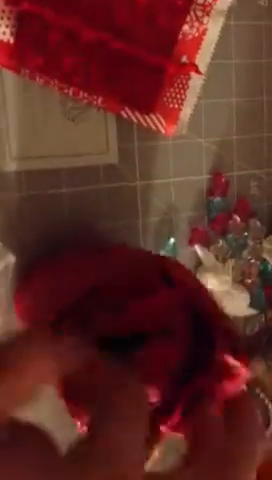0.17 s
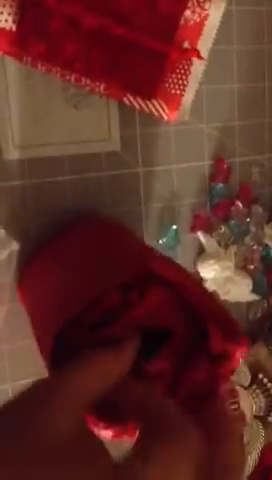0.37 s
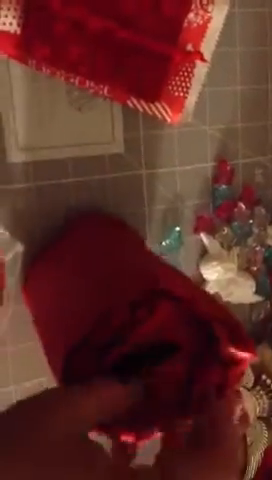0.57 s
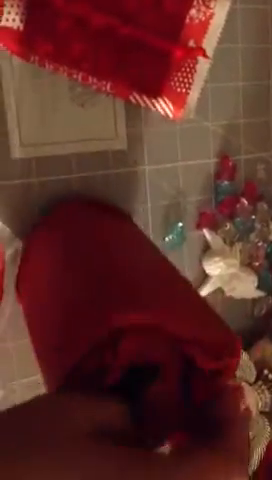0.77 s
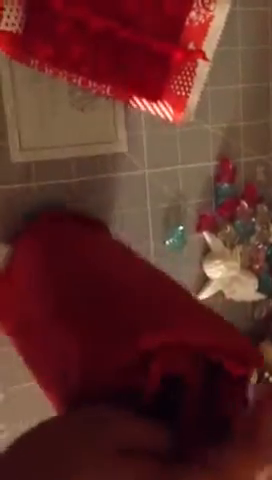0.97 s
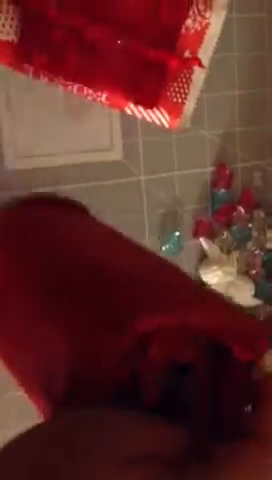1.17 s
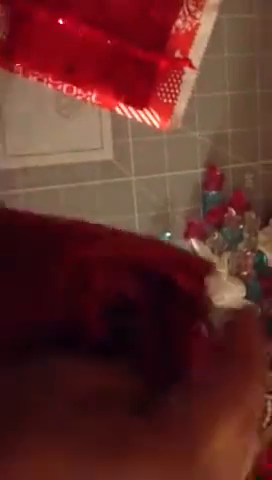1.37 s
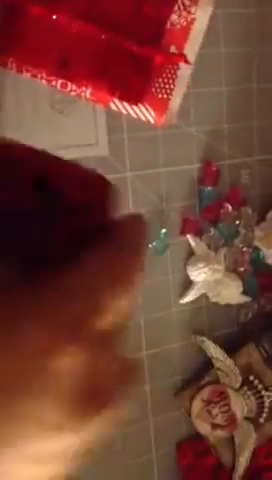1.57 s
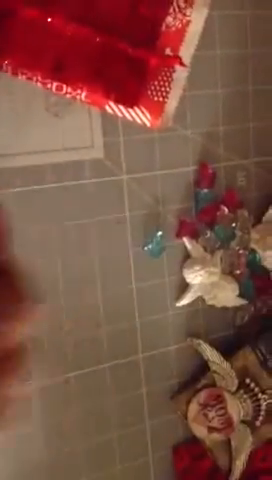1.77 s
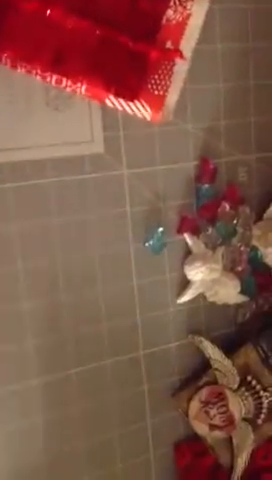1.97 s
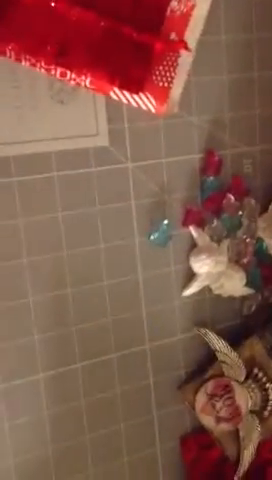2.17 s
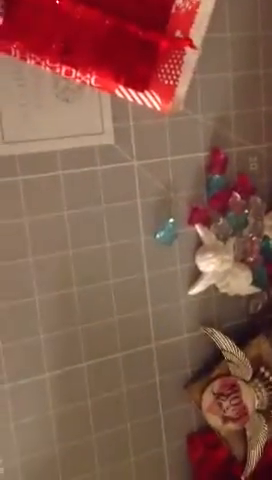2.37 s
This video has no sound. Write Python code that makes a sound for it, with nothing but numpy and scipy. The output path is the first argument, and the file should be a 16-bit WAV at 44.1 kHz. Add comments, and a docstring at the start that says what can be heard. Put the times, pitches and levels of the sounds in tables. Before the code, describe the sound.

Close to a small microphone indoors, wrapping paper crackles in uneven clumps while a present is handled. The paper rustles and snaps, eases briefly, then crackles a little lower as the parcel bumps faintly in the hands.

```python
"""Indoors, close to a small microphone, hands turn and squeeze a parcel in stiff shiny wrapping paper.
Small creases buckle in clumps and make a crackle, over the hiss of paper sliding on paper.
Each buckle is a tick and a few cycles of ring; the loudest snaps stand out and rattle through the folds.
A hollow in the wrap rings along, and the parcel bumps softly in the hands.
The quiet room adds a low hush and gives the snaps and bumps a short echo."""
import sys
import numpy as np
from scipy import signal
from scipy.fft import rfft, irfft
from scipy.io import wavfile
from scipy.ndimage import uniform_filter1d

SR = 44100
rng = np.random.default_rng(int(sys.argv[2]) if len(sys.argv) > 2 else 0)


def bounce(signal):
    """Save signal as a 16-bit WAV file at the path given by the first command-line argument."""
    frames = np.transpose(np.atleast_2d(signal))
    limited = np.clip(frames, -1, 1)
    pcm = np.round(limited * 32767).astype(np.int16)
    wavfile.write(sys.argv[1], SR, pcm)


N = 106192

# How hard the hands work the paper: time_s, level_db, bass_db, treble_db
# (bass and treble count only by how far they are above or below their column's average)
GRIP = [(0.0, -38.5, -7, -9), (0.08, -34.5, -6, -2.5), (0.15, -35.5, -13.5, -6), (0.239, -32, -11.5, -7),
        (0.282, -37.5, -14.5, -6.5), (0.35, -37.5, -18, -5.5), (0.44, -34, -24, -6),
        (0.481, -39.5, -34, -4), (0.55, -32.5, -18, -6.5), (0.73, -34.5, -18.5, -5), (0.76, -35.5, -16, -6),
        (0.84, -30, -12.5, -2.5), (0.87, -33, -14.5, -4.5), (0.93, -31.5, -16, -6.5),
        (0.98, -38.5, -12.5, -5), (1.05, -40.5, -18, -7), (1.08, -35.5, -25, -5.5),
        (1.12, -44.5, 0.5, -2.5), (1.14, -38.5, -10, -0.5), (1.17, -46.5, -20, -11),
        (1.239, -37.5, -6.5, -1.5), (1.28, -34, -8, -12.5), (1.33, -39.5, -12, -3), (1.37, -48, -12, -7),
        (1.42, -36, -13.5, -4.5), (1.47, -38.5, -6, -8), (1.499, -35.5, -9.5, -5.5), (1.64, -43, -10.5, -7),
        (1.67, -39.5, -9, -5), (1.71, -39.5, -11.5, -3), (1.781, -34.5, -6, -3.5), (1.87, -39.5, -6, -6),
        (1.93, -33, -3, -2.5), (1.97, -37, -5, -3.5), (2.05, -34, -6, -5), (2.2, -41, -5, -3),
        (2.28, -33, -2, -5), (2.31, -36.5, -6.5, -5.5), (2.349, -30, -7.5, -5.5), (2.41, -44, -5, 0.5)]
# The tone of the paper, from low to high: pitch_hz, gain_db
PAPER_TONE = [(60, -2), (173, -9.5), (479, -17.5), (656, -11.5), (1080, -9), (2550, -1.5), (4540, 0.5),
              (5170, -1.5), (9430, -6.5), (11300, -8), (15500, -12)]
# A hollow in the wrap that changes as the grip shifts: time_s, pitch_hz, gain_db
WRAP_HOLLOW = [(0, 3030, -19), (0.45, 4270, -12), (0.9, 3700, -21), (1.5, 3080, -28), (1.77, 4050, 2),
               (1.82, 3900, -15), (1.9, 2560, -1), (2.1, 2490, -4), (2.3, 2260, -10)]
# The tone of the quiet room: pitch_hz, gain_db
ROOM_TONE = [(25, -25), (59, -31), (132, -14.5), (172, -11.5), (477, -11), (649, -11.5), (1000, -13.5),
             (1300, -15.5), (2200, -120)]
# The loudest buckles: start_s, ring_db, ring_hz, second_ring_db, second_ring_hz, tick_db, push_db
LOUD_SNAPS = [(0.045, -21.5, 5930, -47, 3970, -38, -72), (0.067, -26, 4130, -22, 5790, -21, -50),
              (0.0695, -22, 6460, -27, 4330, -19, -58), (0.0817, -15, 5900, -17.5, 3830, -41.5, -66),
              (0.092, -17, 5400, -38, 3070, -36, -59), (0.1064, -22, 4200, -29, 7860, -44, -62),
              (0.127, -21, 3440, -39, 4890, -34, -53), (0.186, -16, 4150, -43, 2970, -21, -73),
              (0.2057, -15, 4040, -49, 2430, -20, -70), (0.2165, -16.5, 6500, -38, 4360, -35, -60),
              (0.2411, -16, 4100, -21, 6040, -35, -56), (0.293, -31, 3970, -35, 7800, -34, -62),
              (0.311, -9, 4700, -18, 2350, -24, -37), (0.3814, -20, 3680, -22.5, 2450, -33, -55),
              (0.4417, -15.5, 3600, -19, 2100, -23, -35.5), (0.444, -21, 5810, -36, 4220, -33, -57),
              (0.4496, -22, 4180, -30, 5750, -37, -68), (0.4604, -16, 4400, -29, 1950, -23, -43),
              (0.485, -7.5, 4370, -9.5, 7000, -18, -62), (0.6487, -22, 5640, -43, 3810, -46, -52),
              (0.656, -24, 6760, -32, 3430, -33, -49), (0.668, -26, 4670, -19, 7060, -19.5, -43),
              (0.6737, -19, 3680, -31, 5790, -24, -52), (0.7102, -20, 4800, -21, 3160, -35, -67),
              (0.7268, -22, 5540, -38, 3810, -19.5, -55), (0.79, -17.5, 3640, -25, 6630, -19, -72),
              (0.804, -19, 3470, -21, 7470, -26, -33.5), (0.811, -14, 4400, -19, 2500, -24, -54),
              (0.815, -17, 4640, -33.5, 2370, -30, -39), (0.8372, -15, 6120, -33, 3700, -20, -41),
              (0.8431, -15, 5170, -24, 2390, -28, -59), (0.8483, -11.5, 6000, -17, 3560, -6.5, -68),
              (0.855, -12, 4300, -32, 6200, -36, -56), (0.8748, -16.5, 3140, -43, 4760, -25, -61),
              (0.8896, -25, 3500, -29, 7300, -28, -64), (0.9253, -27, 4030, -35, 6000, -20, -62),
              (0.952, -28, 6040, -26, 2500, -22, -45), (0.9688, -32, 5840, -30, 8000, -31, -60),
              (0.9809, -29, 3600, -29.5, 2230, -40, -37.5), (1.0128, -20, 6000, -32, 8380, -27, -57),
              (1.036, -30, 5500, -28, 3200, -35, -60), (1.0412, -18.5, 6600, -23.5, 2870, -32, -67),
              (1.0654, -21.5, 2900, -22, 4910, -17.5, -53), (1.0763, -13.5, 6500, -17.5, 2600, -35, -40),
              (1.0894, -20, 6460, -26, 4300, -35, -60), (1.1053, -26, 3190, -30, 5210, -30, -59),
              (1.1425, -27.5, 2780, -22.5, 6720, -37.5, -61), (1.1868, -33, 5300, -28, 3420, -29, -57),
              (1.1997, -26, 2430, -27, 6330, -27, -58), (1.2101, -21, 3130, -24, 5150, -27, -54),
              (1.2319, -20, 2400, -24, 4130, -30, -34.5), (1.2705, -25, 4930, -25, 2780, -21.5, -48),
              (1.2862, -24, 4500, -23, 3170, -37, -53), (1.295, -41, 4690, -19.5, 6400, -30, -52),
              (1.3632, -20.5, 3280, -29, 2300, -29, -61), (1.403, -21.5, 5100, -26, 3080, -44, -46),
              (1.4147, -26, 2840, -37, 4370, -38, -41), (1.531, -31, 2670, -29, 6910, -50, -63),
              (1.548, -18.5, 5400, -22.5, 2500, -32, -59), (1.5983, -21.5, 3470, -24.5, 6910, -35, -55),
              (1.6749, -13.5, 8140, -47, 2860, -26, -50), (1.6888, -26, 4570, -20.5, 7000, -24, -51),
              (1.767, -16, 4000, -21, 7150, -36, -55.5), (1.78, -32, 4140, -31.5, 1240, -38, -52),
              (1.808, -30, 5160, -28, 7300, -34, -55), (1.838, -17.5, 1710, -32, 4000, -44.5, -39),
              (1.8854, -19.5, 2910, -33, 2150, -19, -61.5), (1.8897, -19.5, 2750, -27, 1660, -24, -30),
              (1.915, -15.5, 2560, -20.5, 1210, -21, -37), (1.918, -16.5, 2170, -17.5, 7900, -37, -43),
              (1.9207, -14, 2710, -38, 5280, -31, -30.5), (1.928, -13, 2720, -30, 6270, -33, -31),
              (1.947, -24, 2630, -18, 7000, -30, -34), (1.96, -15.5, 2280, -21, 3230, -29, -28),
              (2.0005, -24, 4370, -20, 2730, -18, -49), (2.0103, -16.5, 2540, -45, 1870, -44, -35),
              (2.032, -40, 5000, -21, 2700, -21, -60), (2.0517, -13, 2870, -11, 6460, -15, -31.5),
              (2.089, -24, 2240, -30.5, 1110, -22, -37), (2.1127, -23, 3100, -32, 2050, -20, -70),
              (2.1702, -18, 4540, -21.5, 6740, -21, -58), (2.2868, -16, 4420, -18.5, 2260, -27, -30),
              (2.3324, -14, 2950, -14.5, 4570, -22, -35.5), (2.3431, -15, 2350, -22, 5450, -37, -52),
              (2.346, -24, 1940, -26, 2960, -38, -59), (2.3504, -20, 6900, -34, 2490, -33, -27.5),
              (2.3556, -33, 3120, -32.5, 6960, -32, -51), (2.3723, -16.5, 1790, -21, 4730, -24, -29.5),
              (2.399, -21, 4960, -24, 3220, -29, -37)]
# The parcel bumping in the hands: start_s, level_db, pitch_hz
PARCEL_BUMPS = [(0.486, -37.5, 420), (0.685, -39, 500), (0.732, -33.5, 670), (.846, -29, 870),
                (1.244, -40.5, 262), (1.298, -42.5, 280), (1.764, -43.5, 280)]


def amp(db):
    """Turn decibels into a number to multiply by."""
    return 10 ** (np.asarray(db) / 20)


def unit_level(x):
    """Scale a signal so its average power is 1."""
    return x / np.sqrt(np.mean(x ** 2) + 1e-20)


def tone_gain(table, hz):
    """Look up a tone table's gain at any pitch."""
    pitch_hz, gain_db = np.transpose(table)
    return amp(np.interp(np.log(hz + 1), np.log(pitch_hz + 1), gain_db))


def cut_bass(x, hz):
    """Weaken everything below this pitch."""
    return signal.sosfilt(signal.butter(2, hz, "high", fs=SR, output="sos"), x)


def add(mix, start_s, sound):
    """Put a sound into the mix at its start time."""
    part = mix[round(start_s * SR):][:len(sound)]
    part += sound[:len(part)]


def ring(hz, cycles, phase=0):
    """A wave that swells quickly and dies away; more cycles make it last longer."""
    turns = np.arange(600) / SR * hz
    shape = (1 - np.exp(-4.0 * turns)) ** 2 * np.exp(-turns / cycles)
    wave = shape * np.sin(2 * np.pi * (turns + phase))
    offset = shape * wave.sum() / shape.sum()  # taken away so the wave averages zero
    return (wave - offset) / shape.max()


def creases():
    """Tiny creases buckle at random, each with a tick and a ring at one of 24 pitches."""
    creases_per_s, spread_db, tick_db = 2200, 3.1, 2
    kicks = amp(spread_db * np.minimum(rng.exponential(1, N), 2.8))
    kicks *= rng.choice([-1., 1.], N)  # the paper pops in or out
    kicks *= rng.random(N) < creases_per_s / SR
    pitch_choice = rng.integers(0, 24, N)
    out = amp(tick_db) * kicks
    for k, hz in enumerate(np.geomspace(600, 14000, 24)):
        wave = ring(hz, cycles=1.26)
        out += signal.oaconvolve(kicks * (pitch_choice == k), wave / np.linalg.norm(wave))[:N]
    return out


def crackle():
    """Creases and the hiss of sliding paper swell together in clumps and take on the paper's tone."""
    clump_samples, clump_db, slide_db = int(0.0052 * SR), 1.2, -2.5
    wobble = uniform_filter1d(rng.standard_normal(N), clump_samples)
    clumps = amp(clump_db * unit_level(uniform_filter1d(wobble, clump_samples)))
    buckles = rfft(creases() * clumps)
    buckles /= np.sqrt(uniform_filter1d(abs(buckles) ** 2, 1500))  # make all pitches equally strong
    slide = rfft(rng.standard_normal(N) * clumps) / np.sqrt(N)
    hz = np.fft.rfftfreq(N, 1 / SR)
    spectrum = (buckles + amp(slide_db) * slide) * tone_gain(PAPER_TONE, hz)
    spectrum /= 1 + (262 / (hz + 1)) ** 3  # the sheet gives off very little deep sound
    return squeeze(spectrum, hz)


def squeeze(spectrum, hz):
    """The changing grip makes the crackle's bass, middle and treble rise and fall."""
    bass_hz, treble_hz = 1630, 7800
    bass = 1 / (1 + (hz / bass_hz) ** 4)
    treble = 1 - 1 / (1 + (hz / treble_hz) ** 8)
    middle = 1 - bass - treble
    time_s, level_db, bass_db, treble_db = np.transpose(GRIP)
    out, t = np.zeros(N), np.arange(N) / SR
    for band, extra_db in [(bass, bass_db), (middle, 0), (treble, treble_db)]:
        band_db = np.interp(t, time_s, level_db + extra_db - np.mean(extra_db))
        out += irfft(spectrum * band, N) * amp(band_db)
    return out / np.std(irfft(spectrum * middle, N))  # level_db sets the middle band


def hollow(paper):
    """A hollow in the wrap rings with the part of the crackle near its own gliding pitch."""
    time_s, pitch_hz, gain_db = np.transpose(WRAP_HOLLOW)
    t, width_hz = np.arange(N) / SR, 350
    decay = np.exp(-np.pi * width_hz / SR)
    spin = np.exp(2j * np.pi * np.cumsum(np.interp(t, time_s, pitch_hz)) / SR)
    # Shift the hollow's pitch down to zero, smooth away the rest, then shift back.
    smoothed = signal.lfilter([1 - decay], [1, -decay], paper / spin)
    return 2 * amp(np.interp(t, time_s, gain_db)) * (spin * smoothed).real


def room_hush():
    """The steady, low noise of the room."""
    spectrum = rfft(rng.standard_normal(N)) * tone_gain(ROOM_TONE, np.fft.rfftfreq(N, 1 / SR))
    return amp(-58) * unit_level(irfft(spectrum, N))


def patch_ring(db, hz, phase=0):
    """One flat patch of paper rings as it buckles; lower rings die in fewer cycles."""
    return amp(db) * ring(hz, cycles=1.6 * np.sqrt(hz / 4500), phase=phase)


def snaps():
    """Each snap is two rings, a bright tick and a low push, then a rattle through the folds."""
    rattle_db, rattle_fade_s = -6.5, 0.0014
    out, t = np.zeros(N), np.arange(400) / SR
    folds = rng.standard_normal((len(LOUD_SNAPS), 400)) * np.exp(-t / rattle_fade_s) * (t > 0.0003)
    for row, echoes in zip(LOUD_SNAPS, folds):
        start_s, ring_db, ring_hz, second_ring_db, second_ring_hz, tick_db, push_db = row
        phase, tick_shift, variation = rng.random(3)
        rings = patch_ring(ring_db, ring_hz) + patch_ring(second_ring_db, second_ring_hz, phase)
        tick = ring(hz=11000 * (0.998 + 0.12 * tick_shift), cycles=2.4, phase=variation)
        push = ring(hz=850 * (0.8 + 0.4 * variation), cycles=1.2)
        snap = rings + amp(tick_db) * tick + amp(push_db) * push
        rattle = np.convolve(snap, echoes / np.linalg.norm(echoes))
        add(out, start_s, snap)
        add(out, start_s, amp(rattle_db) * rattle)
    return cut_bass(out, hz=450)  # a small patch gives off little bass


def with_room_echo(x):
    """The room follows a sound with a short, soft echo."""
    echo_db, fade_s = -13, 0.079  # the echo falls 60 dB in fade_s
    t = np.arange(6000) / SR
    tail = rng.standard_normal(len(t)) * np.exp(-t * np.log(1000) / fade_s) * (t > 0.003)
    return x + amp(echo_db) * signal.oaconvolve(x, tail / np.linalg.norm(tail))[:N]


def bumps():
    """The parcel makes one dull swing each time it bumps in the hands."""
    out = np.zeros(N)
    for start_s, level_db, pitch_hz in PARCEL_BUMPS:
        add(out, start_s, amp(level_db) * ring(pitch_hz, cycles=0.7))
    return cut_bass(out, hz=110)


def scene():
    """Mix the parcel and the room into one channel."""
    snaps_and_bumps = with_room_echo(snaps() + bumps())
    paper = crackle()
    return (paper + hollow(paper) + room_hush() + snaps_and_bumps)[None]


def record(dry):
    """The small microphone drops the deep bass; the very highest treble is cut too."""
    top_hz = 15280
    treble_cut = signal.firwin(1501, top_hz, window=("kaiser", 6), fs=SR)
    return signal.oaconvolve(cut_bass(dry, hz=90), treble_cut[None], "same")


dry = scene()
out = record(dry)
bounce(out)
```